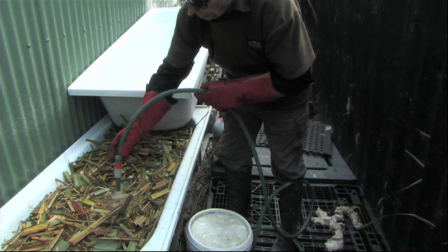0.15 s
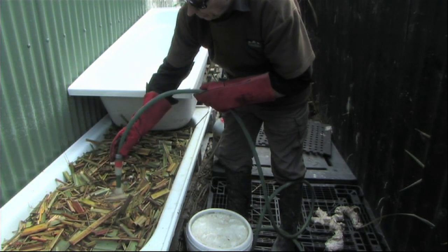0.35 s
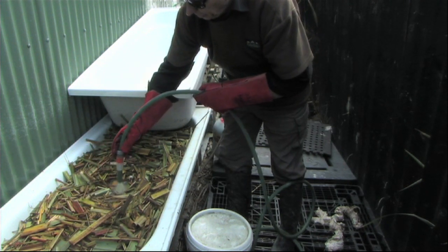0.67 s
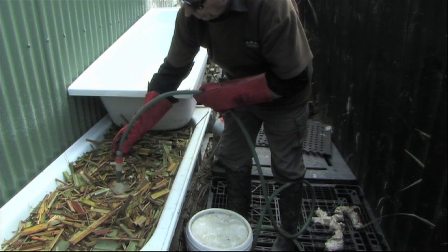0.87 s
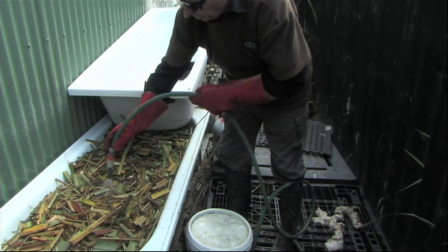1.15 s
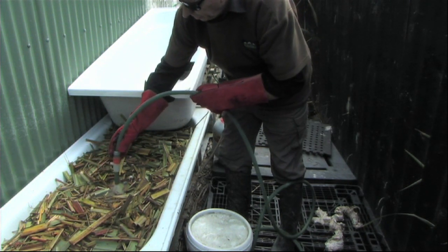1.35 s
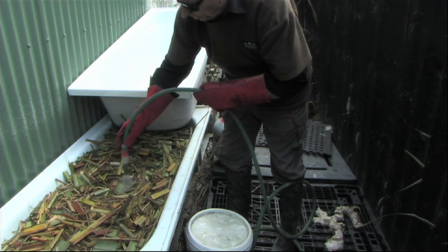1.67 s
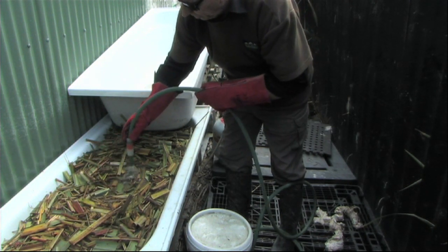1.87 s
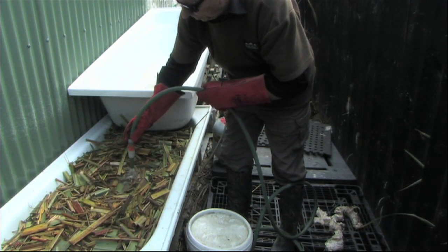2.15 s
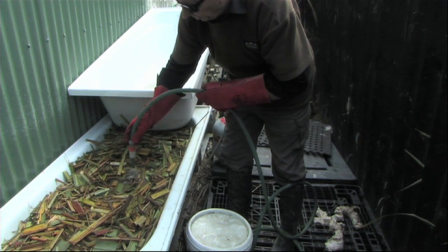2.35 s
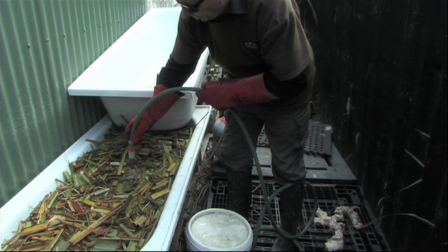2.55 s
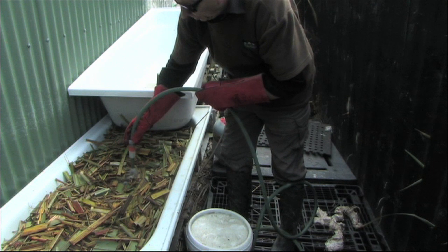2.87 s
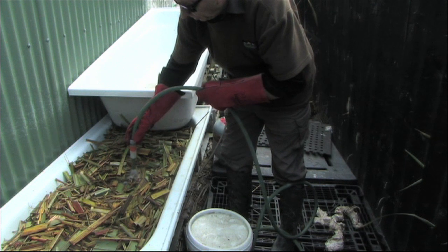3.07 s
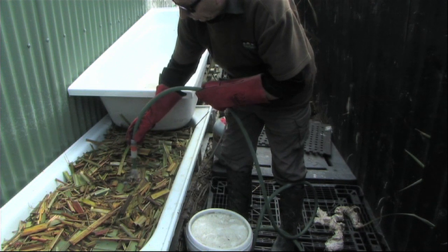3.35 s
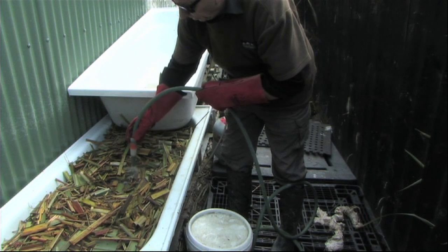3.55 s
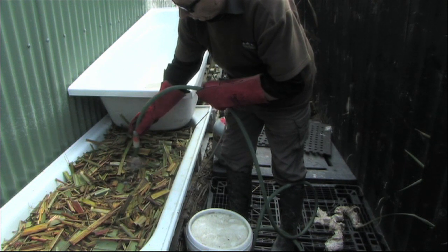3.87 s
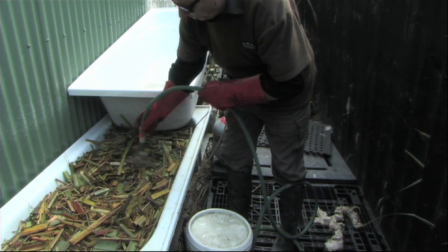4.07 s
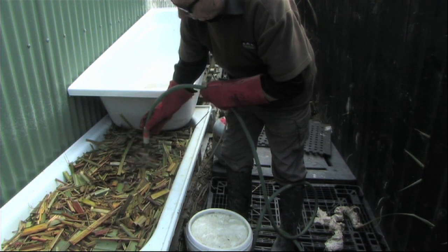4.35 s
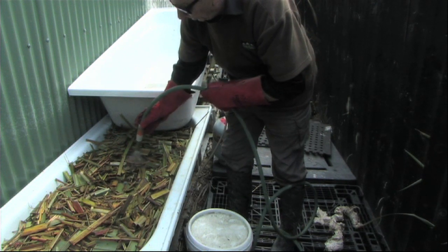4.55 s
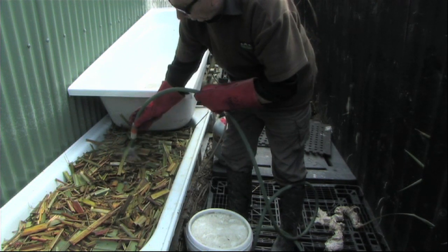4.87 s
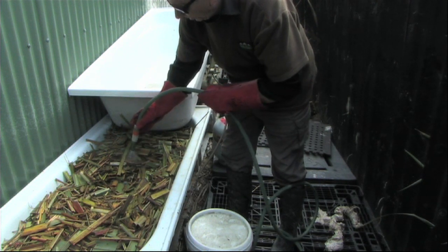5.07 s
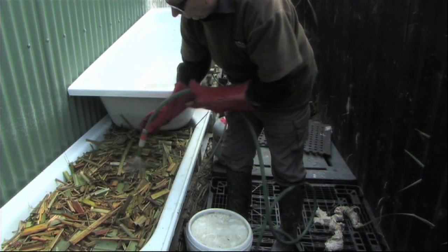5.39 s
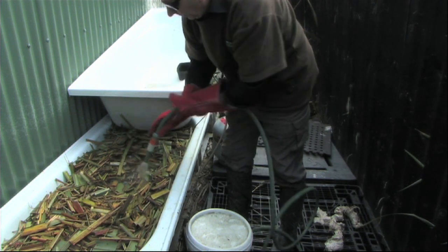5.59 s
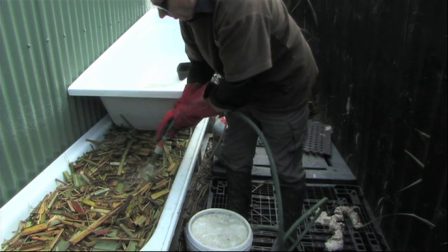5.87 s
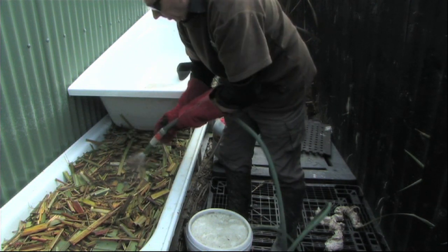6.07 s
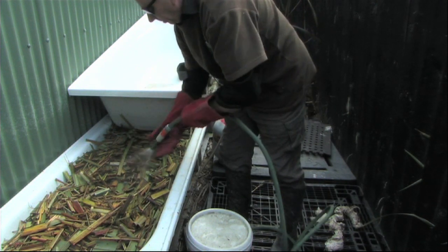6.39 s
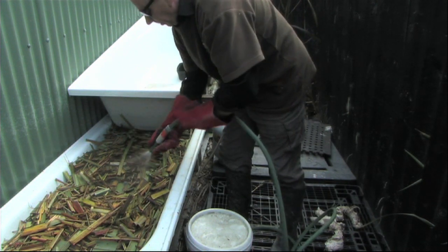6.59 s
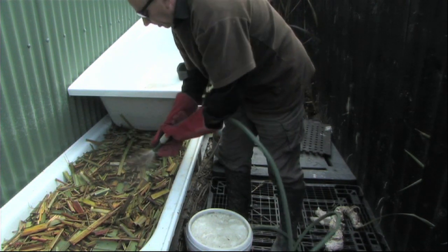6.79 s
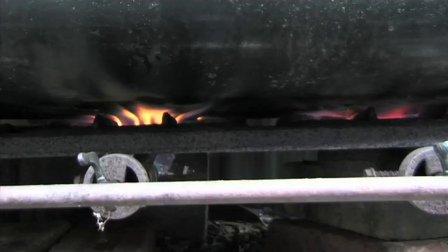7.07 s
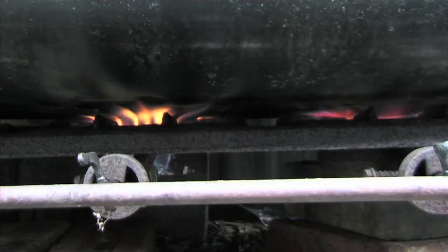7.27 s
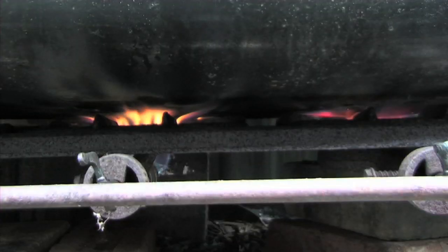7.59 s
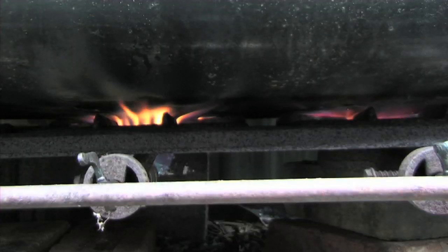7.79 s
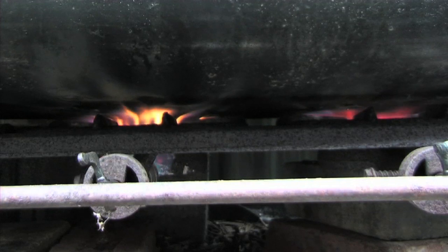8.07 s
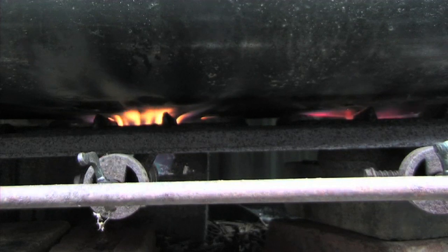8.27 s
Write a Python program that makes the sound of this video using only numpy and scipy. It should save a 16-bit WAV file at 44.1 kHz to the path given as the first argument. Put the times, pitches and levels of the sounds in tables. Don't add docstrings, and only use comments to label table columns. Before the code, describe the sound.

A loud, sharp water-jet hiss with splashing and hollow gurgles, an engine swelling behind it, suddenly gives way to quiet hissing burners and a tiny chirp.

```python
import sys
import numpy as np
from scipy import signal
from scipy.fft import rfft, irfft, next_fast_len
from scipy.io import wavfile
from scipy.ndimage import uniform_filter1d, map_coordinates

SR = 44100
rng = np.random.default_rng(int(sys.argv[2]) if len(sys.argv) > 2 else 0)


def to_wav(sig):
    pcm = np.clip(np.atleast_2d(sig), -1, 1) * 32767
    pcm = np.round(pcm).astype(np.int16)
    wavfile.write(sys.argv[1], SR, pcm.T)


def to_linear_factor(level_db):
    exponent = np.asarray(level_db, float) / 20
    return 10 ** exponent


N = 372192
T_S = np.arange(N) / SR

# t/s, level/dB, nozzle resonance f/Hz, squareness of the blow/dB
JET = [(0, -29.3, 6800, 0.5), (0.45, -28.5, 6800, -0.5), (0.9, -28.5, 6500, 1), (1.5, -29.5, 6600, 1.5),
       (1.85, -28.5, 6900, 0.3), (2.4, -28, 6600, 0.5), (3.0, -30, 6500, -1.5), (3.2, -32, 6600, -2),
       (3.4, -29.5, 6800, -2), (4.0, -30.5, 6400, -2.5), (4.4, -29.5, 6600, -3), (4.78, -27.5, 6500, -0.5),
       (5.2, -30.5, 6400, 0.5), (5.6, -28.5, 6500, 0.3), (5.82, -31.5, 6400, 0.3), (5.95, -27.5, 6200, 0.3),
       (6.4, -28, 6600, -0.5), (7.03, -29, 6900, 0.3)]
# f/Hz, density/dB per Hz
HISS_COLOUR = [(1500, -55), (2500, -15), (3500, -11.5), (4300, -9.5), (4700, -6.5), (5000, -6),
               (5350, -1.5), (5700, -2), (6300, -1), (7000, -1), (8000, -2.5), (9000, -7.5), (12000, -15),
               (15700, -29)]
MIST_COLOUR = [(7000, -34), (9000, 3.5), (11000, -1.5), (13200, -4), (14500, -2.5), (15600, -8),
               (15800, -10)]
SPLASH_COLOUR = [(200, -50), (400, -11.5), (900, -8.5), (1500, -2.5), (2500, 0), (3500, -0.5), (5000, 1.5),
                 (8000, -35)]
# f/Hz, correlation
JET_ALIKE = [(100, 0.26), (600, 0.5), (2000, 0.57), (3000, 0.45), (4000, 0.63), (4600, 0.51), (5900, 0.91),
             (6600, 0.64), (8000, 0.95), (9500, .25), (11000, 0.36), (12300, .1), (14000, .3), (15700, .5)]
MIST_DB, SPLASH_DB, HISS_DB = -10, -12, 0.4
FOLLOWS = 0.3
THINS = 0.3

# t/s, length/s, level/dB
GAP_CROSSINGS = [
    [(0.02, 1.6, -54), (0.6, 0.15, -50), (0.86, 0.25, -46.5), (1.26, 0.15, -52), (1.63, 0.14, -40.5),
     (2.75, 0.1, -53), (3.4, 0.26, -53.5), (4.05, 0.087, -48.5), (4.4, 0.22, -43)],
    [(0.58, 0.18, -45.5), (1.33, 0.12, -48), (1.74, 0.07, -43), (1.86, 0.15, -39.5), (2.06, 0.19, -36),
     (2.56, 0.06, -41), (2.3, 1.45, -49.5)],
    [(0.2, 0.15, -52), (0.6, 0.55, -52), (1.25, 0.27, -51.5), (1.66, 0.12, -43), (2.1, 0.17, -45),
     (2.55, 0.084, -42), (2.7, 1.0, -49.5)],
]
# f/Hz, width/Hz
GAP_SHAPES = [(690, 280), (2130, 240), (1620, 480)]
GAP_MURMUR_DB = [-59.5, -57.5, -56.5]
FILL_S = 0.033

# t/s, firing f/Hz
SHAFT = [(0, 73), (.85, 74), (2.35, 75.7), (3.35, 77.3), (4.35, 78.2), (5.3, 78.8), (5.85, 77.9),
         (6.35, 76.6), (7.1, 78)]
# t/s, level/dB
EFFORT = [(0, 1.5), (1.3, 0.5), (2.1, 3), (2.9, -9), (3.8, -13), (5.3, -15), (5.7, -10), (5.93, 1),
          (6.05, -7), (6.17, -2), (6.32, -9), (6.45, 3), (6.6, -7.5), (6.85, -1), (7.05, -10)]
ORDER_RATIOS = [2, 1, 5 / 3, 5.47]
# level at closest/dB, growth with nearness, loudest earlier by t/s, throttle share
ORDERS = [
    (-38, 0.68, 0.01, 0.97),
    (-51, 0.9, 0.95, 0.27),
    (-46.5, 0.72, 0.25, 0.041),
    (-47.5, 2.1, 0.9, 0.01),
]
# phase drift/rad, left lead/rad, left minus right/dB
ORDER_SIDES = [(.25, 0.85, 2), (.35, 1.3, -2.5), (.7, 1.1, 0), (1.6, 0.84, -1)]
# level at closest/dB, growth with nearness
ROAD_NOISES = [
    (-34, 1.22),
    (-44.5, 1.0),
    (-36, 1.08),
]
# f/Hz, density/dB per Hz
ROAR_COLOUR = [(100, -23.5), (170, -2.5), (198, -5), (275, -5), (312, -4.5), (361, -9.5), (415, -3),
               (451, -8.5), (491, -3), (530, -6), (622, -6), (900, -11.5), (1170, -39), (1980, -120)]
RUMBLE_COLOUR = [(15, -60), (30, -32), (50, -18), (70, -9), (100, -1), (125, 0), (170, -3), (220, -12),
                 (300, -40)]
TYRE_COLOUR = [(500, -28), (700, -2.5), (1000, 0), (1500, -4), (2500, -11.5), (4000, -38)]
# f/Hz, correlation
ROAD_ALIKE = [(30, .6), (130, 0.85), (300, 0.45), (700, 0.3), (1800, 0.067)]
PASS_S, NEAR_S = 6.2, 0.68

# f/Hz, chance level under which a band drops out
DROPOUT_CHANCE = [(8000, -5), (11000, -2.3), (12800, -1.2), (13500, -0.2), (14600, -0.6), (15300, -0.6),
                  (15700, -.4)]
# t/s, first-scene level/dB
CUT = [(7.034, 0.5), (7.038, -16), (7.046, -10), (7.062, -34), (7.07, -90)]

# f/Hz, density/dB per Hz
GAS_COLOUR = [(1710, -31), (2900, -12), (3160, -11), (3640, -6.5), (4860, -7), (6630, -3.5), (7060, -4.5),
              (11700, -9.5), (15700, -13.5)]
FLAME_COLOUR = [(13, -42), (22, -15), (91, -7), (119, -2), (237, -3), (322, -10), (359, -34), (400, -19),
                (520, -52), (880, -120)]
TANK_COLOUR = [(210, -36), (350, -2.5), (1040, -6.5), (1230, -3.5), (1400, -4), (1750, -4), (3200, -6.5),
               (4160, -30), (7040, -120)]
# f/Hz, width/Hz, lift/dB
PIPES = [(820, 42, 5), (1040, 160, 6.5), (1396, 96, 7.5), (2670, 180, 8), (6050, 100, -1), (6430, 82, 4),
         (6640, 68, 7), (11400, 220, 3)]
# f/Hz, correlation
BURNER_ALIKE = [(60, 0.84), (700, 0.46), (1400, 0.45), (2200, .35), (4500, .27), (5600, 0.59), (6600, 0.58),
                (8000, 0.43), (9600, .12), (15700, .1)]
GAS_DB, TANK_DB, FLAME_DB = -44.5, -50, -55
DUCKED_DB, HOLD_S, RECOVER_S = -10.5, 7.115, 0.29

# t/s, peak level/dB, f/Hz
CHIRP = [(7.243, -48, 4250), (7.2705, -38.5, 4200), (7.297, -43, 3600), (7.3128, -38, 3630),
         (7.331, -51, 2900), (7.347, -51, 2750)]
# t/s, f/Hz, level/dB
SWEEP = [(7.23, 4400, -90), (7.24, 4380, -55), (7.283, 4380, -48), (7.293, 3710, -52), (7.33, 3650, -51),
         (7.36, 3100, -59), (7.38, 2900, -90)]

# f/Hz, left lead/rad, left minus right/dB
PORTS = [(200, 0.13, -0.5), (900, 0, -1), (1300, 0, 1.5), (2050, 0.5, -3), (3180, 0.37, 0), (3800, 0, 1),
         (4700, 0.83, -1), (5650, -1.5, 3.5), (6200, 0.1, -2.5), (7100, 0.5, 2.5), (8200, -0.3, -0.5),
         (9240, 1.63, 3), (10200, 0.1, 2), (12500, 3, 3), (13800, 4, 0.5), (15000, 5.5, -2)]
TOP_HZ = 15740

HOP = 128
STFT = dict(nperseg=4 * HOP, noverlap=3 * HOP)
PATCH, STREAK, DROPOUT = (7, 24), (2, 90), (4, 8)
FRAMES_S = np.arange(N // HOP + 2) * HOP / SR
BINS_HZ = np.fft.rfftfreq(4 * HOP, 1 / SR)[:, None]
SIDES = np.array([[.5], [-.5]])


def unit(x):
    return x / np.sqrt(np.mean(x ** 2) + 1e-20)


def along(points, hz):
    f, v = np.transpose(points)
    return np.interp(np.log(hz + 1), np.log(f + 1), v)


def curves(rows, t_s=T_S):
    s, *cols = np.transpose(rows)
    return [np.interp(t_s, s, c) for c in cols]


def wobble(rate_hz):
    knots = rng.standard_normal(int(N * rate_hz / SR) + 4)
    return map_coordinates(knots, [np.arange(N) * rate_hz / SR])


def hump(centre_hz, width_hz, hz):
    return 1 / (1 + (2 * (hz - centre_hz) / width_hz) ** 2)


def patches(shape, bins, frames):
    field = uniform_filter1d(rng.standard_normal(shape), size=bins, axis=0)
    return unit(uniform_filter1d(field, size=frames, axis=1))


def filtered(x, response):
    size = next_fast_len(N + 8 * HOP)
    spectrum = rfft(x, size) * response(np.fft.rfftfreq(size, 1 / SR))
    return irfft(spectrum, size)[..., :N]


def rush(colour_db, alike, patchy_db, streaky_db=1.53, moving_db=0):
    z = signal.stft(rng.standard_normal((2, N + HOP)), **STFT)[2][..., :len(FRAMES_S)]
    field_db = patchy_db * patches(z.shape[1:], *PATCH)
    field_db = field_db + streaky_db * patches(z.shape[1:], *STREAK)
    pair = signal.istft(z * to_linear_factor(field_db + moving_db), **STFT)[1][:, :N]

    def mid_side(hz):
        turn_rad = np.arccos(np.clip(along(alike, hz), -1, 1)) / 2
        return to_linear_factor(colour_db(hz)) * np.array([np.cos(turn_rad), np.sin(turn_rad)])

    mid, side = filtered(pair, mid_side)
    return unit(np.array([mid + side, mid - side]))


def droplets(count, centre_hz, cycles):
    when, pitch, size, place = rng.random((count, 4)).T
    hz = np.clip(centre_hz * np.exp(.9 * (pitch - .5)), 100, SR / 2.2)[:, None]
    t_s = np.arange(64) / SR
    ring = np.sin(2 * np.pi * hz * t_s) * np.exp(-t_s * hz / cycles) * np.hanning(64)
    grain = to_linear_factor(-3 * np.log(size + .01))[:, None] * ring
    at = ((when * N).astype(int)[:, None] + np.arange(64)).ravel()
    shares = (.2 + .6 * place, .8 - .6 * place)
    ports = [np.bincount(at, (grain * np.sqrt(p)[:, None]).ravel(), N + 64)[:N] for p in shares]
    return unit(np.array(ports))


def spray():
    jet_db, _, square_db = curves(JET)
    nozzle_hz = curves(JET, FRAMES_S)[1]
    delay_s = .0017 * (1 + .012 * np.interp(FRAMES_S, T_S, wobble(.8)))
    comb_db = 20 * np.log10(np.abs(1 + .18 * np.exp(-2j * np.pi * BINS_HZ * delay_s)))
    nozzle_db = 2.8 * hump(nozzle_hz, 1300, BINS_HZ)
    surge_db = 0.62 * wobble(14) + .3 * wobble(8)

    hiss = rush(lambda f: along(HISS_COLOUR, f), JET_ALIKE, patchy_db=1.3, streaky_db=2.2,
                moving_db=nozzle_db + comb_db)
    hiss = hiss / np.sqrt(uniform_filter1d(np.mean(hiss ** 2, axis=0), size=SR // 3))
    hiss = hiss + to_linear_factor(-14.0) * droplets(count=30000, centre_hz=6500, cycles=2.6)

    steadier_db = (FOLLOWS - 1) * (jet_db - jet_db.mean())
    mist_db = MIST_DB + steadier_db - THINS * square_db + 0.73 * wobble(7)
    mist = rush(lambda f: along(MIST_COLOUR, f), JET_ALIKE, patchy_db=1.7, streaky_db=2.3)
    splash_db = SPLASH_DB + steadier_db + square_db
    splash = rush(lambda f: along(SPLASH_COLOUR, f), JET_ALIKE, patchy_db=1.15, streaky_db=1.1,
                  moving_db=comb_db)
    return to_linear_factor(HISS_DB + jet_db + surge_db) * (hiss + to_linear_factor(mist_db) * mist + to_linear_factor(splash_db) * splash)


def singing_gaps():
    sung = 0
    for crossings, murmur_db, (hz, width_hz) in zip(GAP_CROSSINGS, GAP_MURMUR_DB, GAP_SHAPES):
        power = to_linear_factor(2 * murmur_db)
        for start_s, length_s, db in crossings:
            enter = np.tanh((T_S - start_s) / FILL_S)
            leave = np.tanh((T_S - start_s - length_s) / FILL_S)
            power = power + to_linear_factor(2 * db) * (enter - leave) / 2
        band_db = lambda f: -15 * np.log10(1 + (2 * (f - hz) / width_hz) ** 4)
        noise = rush(band_db, JET_ALIKE, patchy_db=0.8, streaky_db=1.3)
        sung = sung + np.sqrt(power) * to_linear_factor(1.0 * wobble(30.13)) * noise
    return sung


def nearness(earlier_s):
    return -10 * np.log10(1 + ((T_S - PASS_S + earlier_s) / NEAR_S) ** 2)


def tone(hz, db, drift_rad, lead_rad, lean_db):
    phase = 2 * np.pi * np.cumsum(hz) / SR + drift_rad * wobble(9)
    level = to_linear_factor(db + 1.1 * wobble(12) + lean_db * SIDES)
    return np.sqrt(2) * level * np.sin(phase + lead_rad * SIDES)


def vehicle():
    firing_hz, effort_db = curves(SHAFT)[0], curves(EFFORT)[0]
    levels_db = [db + grows * nearness(earlier_s) + share * effort_db
                 for db, grows, earlier_s, share in ORDERS]
    levels_db[-1] += 2.5 * wobble(7)
    lines = sum(tone(ratio * firing_hz, db, *sides)
                for ratio, db, sides in zip(ORDER_RATIOS, levels_db, ORDER_SIDES))
    lines += tone(3 * firing_hz, levels_db[0] - 20, drift_rad=.5, lead_rad=.8, lean_db=.5)

    roar_db, rumble_db, tyre_db = (db + grows * nearness(0) for db, grows in ROAD_NOISES)
    roar = rush(lambda f: along(ROAR_COLOUR, f), ROAD_ALIKE, patchy_db=1.5)
    roar = to_linear_factor(roar_db + 1.0 * wobble(5)) * roar
    rumble = rush(lambda f: along(RUMBLE_COLOUR, f), ROAD_ALIKE, patchy_db=-1.0)
    rumble = to_linear_factor(rumble_db + 1.1 * wobble(3.6)) * rumble
    tyres = rush(lambda f: along(TYRE_COLOUR, f), ROAD_ALIKE, patchy_db=2.0)
    tyres = to_linear_factor(tyre_db + 0.88 * wobble(5.5)) * tyres
    return lines + roar + rumble + tyres


def top_dropouts(x):
    z = signal.stft(np.pad(x, ((0, 0), (0, HOP))), **STFT)[2]
    blocks = patches(np.array(z.shape[1:]) // DROPOUT + 1, 1, 4)
    chance = np.kron(blocks, np.ones(DROPOUT))[:z.shape[1], :z.shape[2]]
    kept = chance > along(DROPOUT_CHANCE, BINS_HZ)
    return signal.istft(z * kept, **STFT)[1][:, :N]


def burners():
    gain_db = DUCKED_DB * np.exp(-np.clip(T_S - HOLD_S, 0, None) / RECOVER_S)
    pipes_db = lambda f: sum(lift_db * hump(hz, width_hz, f) for hz, width_hz, lift_db in PIPES)
    gas = rush(lambda f: along(GAS_COLOUR, f) + pipes_db(f), BURNER_ALIKE, patchy_db=0.4)
    gas = to_linear_factor(GAS_DB + .4 * wobble(8.3)) * gas
    tank = to_linear_factor(TANK_DB) * rush(lambda f: along(TANK_COLOUR, f) + pipes_db(f), BURNER_ALIKE, patchy_db=1.0)
    flame = rush(lambda f: along(FLAME_COLOUR, f), BURNER_ALIKE, patchy_db=1.1)
    flame = to_linear_factor(FLAME_DB - .3 * gain_db + 1.2 * wobble(8)) * flame
    return to_linear_factor(gain_db) * (gas + tank + flame)


def bird():
    notes = sum(to_linear_factor(db) * np.exp(-((T_S - s) / 0.0028) ** 2) * np.sin(2 * np.pi * hz * T_S)
                for s, db, hz in CHIRP)
    sweep_hz, sweep_db = curves(SWEEP)
    breath = unit(filtered(rng.standard_normal(N), lambda f: hump(0, 1000, f)))
    call = notes + to_linear_factor(sweep_db) * breath * np.sin(2 * np.pi * np.cumsum(sweep_hz) / SR)
    yard = rng.standard_normal((2, SR // 8)) * to_linear_factor(-60 * np.arange(SR // 8) / SR / .1)
    echoes = signal.fftconvolve(call[None], yard / np.linalg.norm(yard[0]), axes=1)[:, :N]
    return call + to_linear_factor(-13) * echoes


def scene():
    stay = to_linear_factor(curves(CUT)[0])
    first = top_dropouts(spray() + singing_gaps() + vehicle())
    second = burners() + bird()
    return stay * first + np.sqrt(np.abs(1 - stay ** 2)) * second


def band_limit(x):
    return signal.sosfilt(signal.butter(12, 17070, fs=SR, output="sos"), x)


def record(dry):
    hz, lead_rad, lean_db = np.transpose(PORTS)

    def ports(f):
        level = to_linear_factor(np.interp(f, hz, lean_db) * SIDES)
        phase = np.exp(1j * np.interp(f, hz, lead_rad) * SIDES)
        return level * phase * (f < TOP_HZ)

    mix = filtered(dry, ports)
    return band_limit(mix)


dry = scene()
out = record(dry)
to_wav(out)
```